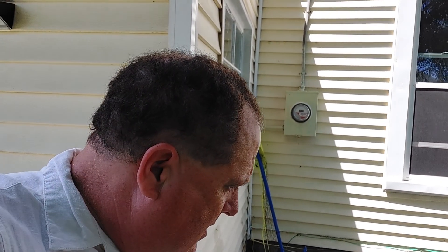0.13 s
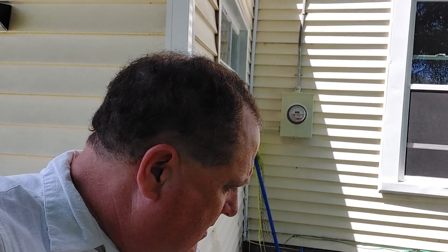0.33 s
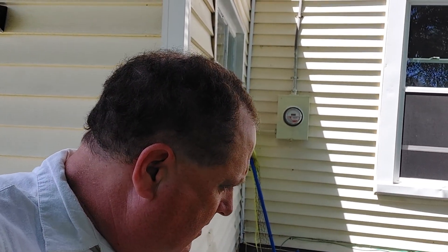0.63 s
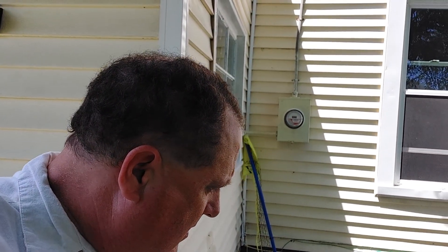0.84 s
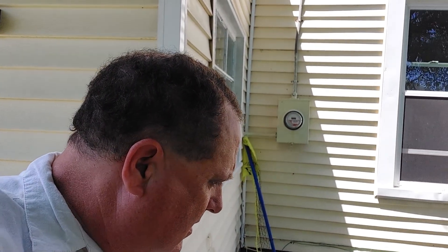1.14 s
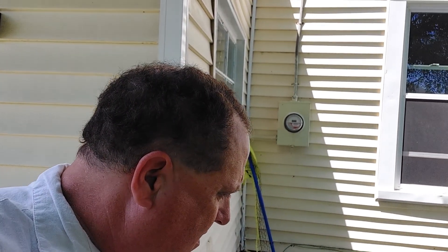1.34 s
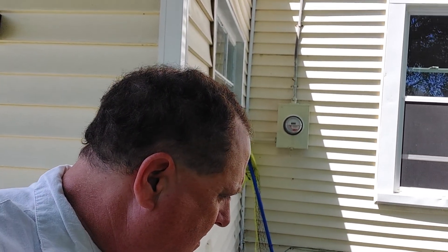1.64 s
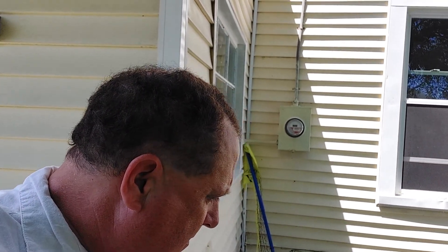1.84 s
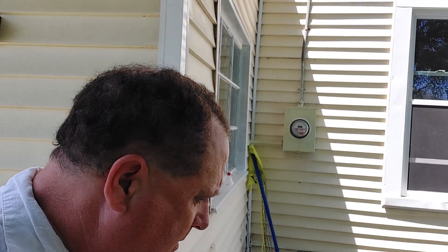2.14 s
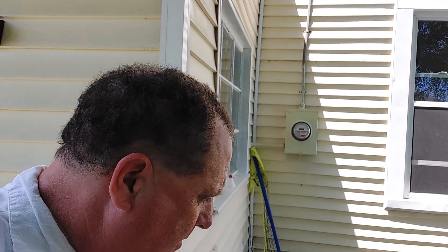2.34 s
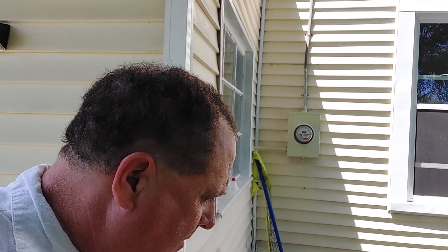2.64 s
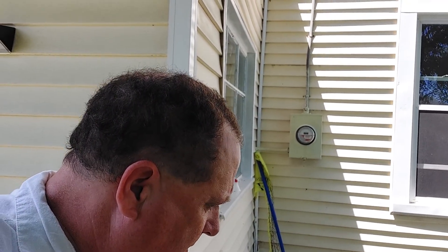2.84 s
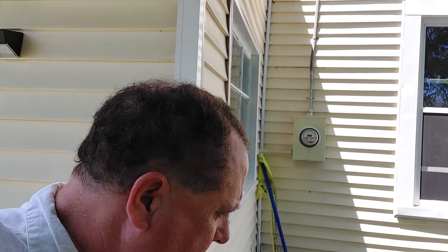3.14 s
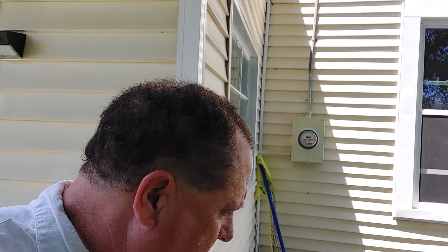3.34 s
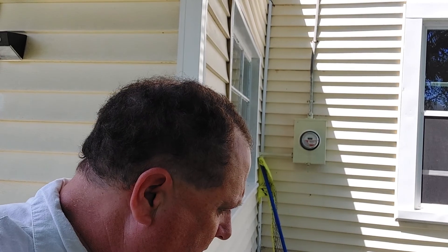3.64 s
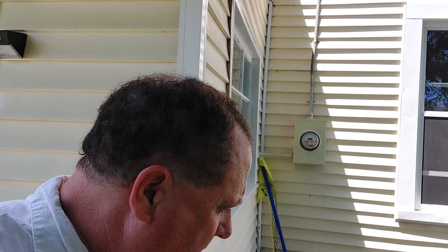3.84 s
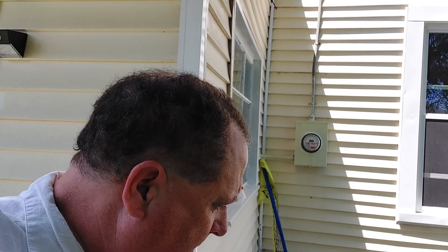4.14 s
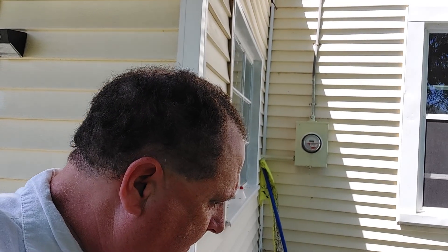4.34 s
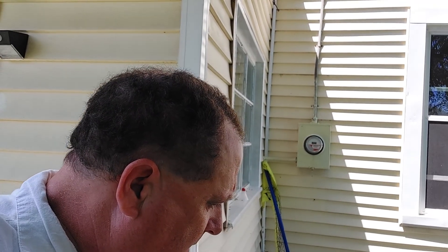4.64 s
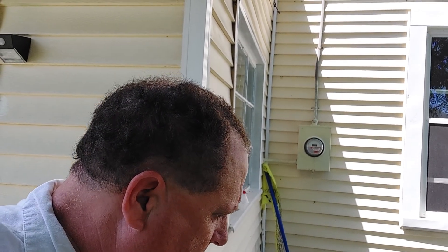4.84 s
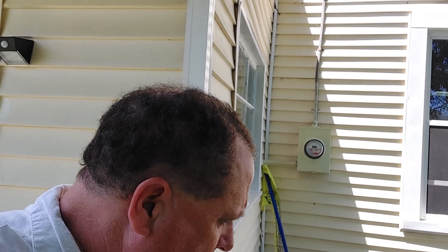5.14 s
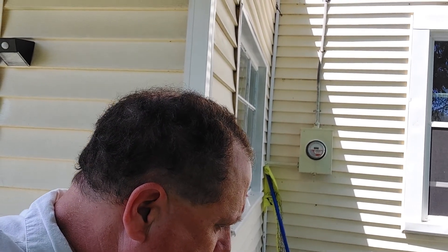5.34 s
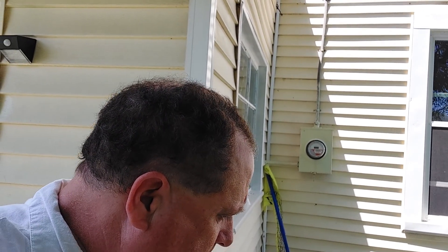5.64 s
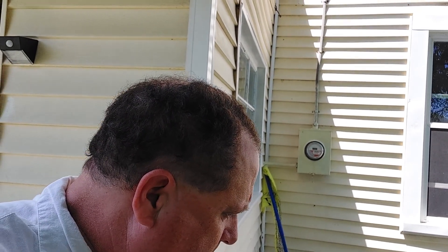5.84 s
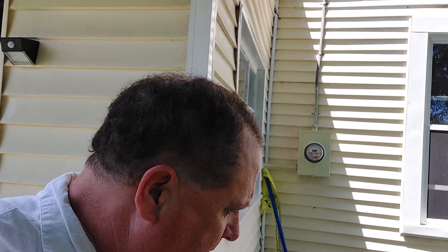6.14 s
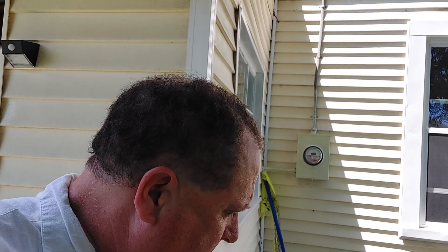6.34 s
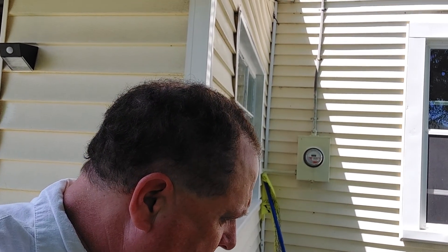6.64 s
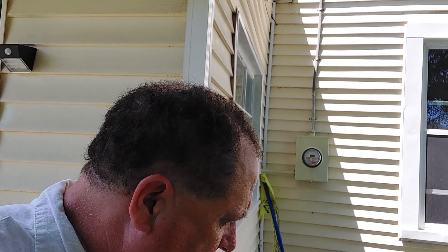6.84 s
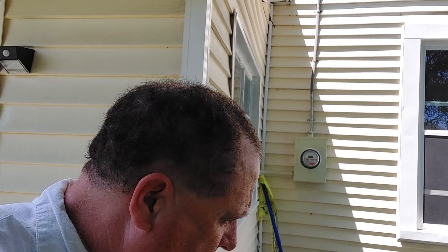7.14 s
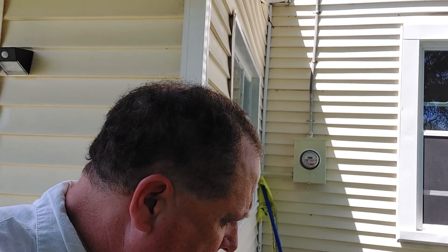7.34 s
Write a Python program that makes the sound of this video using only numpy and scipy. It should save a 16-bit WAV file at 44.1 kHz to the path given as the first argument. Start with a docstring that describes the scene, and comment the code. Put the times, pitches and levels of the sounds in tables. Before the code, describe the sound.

Outdoors, a utensil scrapes and squeaks on metal over low breeze rumble, then meat lands on a grill and sizzles sharply, spitting fat and slowly easing.

```python
"""A breeze rumbles on two microphone ports and a far motor drones, while a utensil scrapes and squeaks.
Then meat meets a small foil-lined backyard grill, close by: the sizzle flares up and slowly settles.
Steam noise and random rains of tiny bursts ring through the grill's bowl, with louder spits of fat.
Shaped noise makes the rustles, soft knocks and breeze; gliding or damped tones make squeaks, drone and thuds."""
import sys
import numpy as np
from scipy import signal
from scipy.fft import rfft, irfft
from scipy.io import wavfile
from scipy.ndimage import uniform_filter1d, map_coordinates

SR = 44100
rng = np.random.default_rng(int(sys.argv[2]) if len(sys.argv) > 2 else 0)


def transcribe(signal):
    """Save signal, clipped to [-1, 1], as a 16-bit WAV file at the path in sys.argv[1]."""
    frames = np.atleast_2d(signal).T
    limited = np.clip(frames, -1, 1)
    pcm = np.round(limited * 32767).astype(np.int16)
    wavfile.write(sys.argv[1], SR, pcm)


N = 329868
TIME = np.arange(N) / SR
HZ = np.fft.rfftfreq(N, 1 / SR)
# Table levels are in dB; some functions add a trim.


def gain_of(db):
    """Decibels to gain."""
    return 10 ** (np.asarray(db) / 20)


def evened(x):
    """Scales to an rms of 1."""
    return x / np.sqrt(np.mean(x ** 2) + 1e-20)


def read(points, hz, axis=1):
    """One column of a spectrum table, on a log-frequency axis."""
    points = np.asarray(points)
    return np.interp(np.log(hz + 1), np.log(points[:, 0] + 1), points[:, axis])


def follow(rows):
    """A curve of (time, value) points at every sample."""
    return np.interp(TIME, *np.transpose(rows))


def add(mix, start_s, sound):
    """Mixes a sound in at a time."""
    part = mix[:, round(start_s * SR):][:, :sound.shape[1]]
    part += sound[:, :part.shape[1]]


def flutter(rate_hz):
    """Random wandering of unit size, up to about the given rate."""
    spectrum = rfft(rng.standard_normal(N)) / (1 + (HZ / rate_hz) ** 2)
    return evened(irfft(spectrum, N))


def split(x, hz):
    """The parts of a sound below and above a frequency."""
    return [signal.sosfilt(signal.butter(2, hz, kind, fs=SR, output="sos"), x) for kind in ("low", "high")]


def swell(start_s, swell_s, steepness):
    """A push that rises to 1 in its swell time and lets go more slowly."""
    out, first = np.zeros(N), int(max(start_s, 0) * SR)
    u = TIME[:min(N - first, int(10 * swell_s * SR))] / swell_s
    out[first:first + len(u)] = (u * np.exp(1 - u)) ** steepness
    return out


def swells(rows, steepness):
    """The joint strength of a table of pushes."""
    return sum(gain_of(db) * swell(start_s, swell_s, steepness) for start_s, db, swell_s in rows)


# Likeness of the two ports for sounds of the grill and yard: pitch_hz, likeness (0-1)
SIZZLE_SAME = [(100, 0.98), (600, 0.91), (1150, 0.71), (1800, 0.99), (2500, 0.26), (4000, 0.37), (7000, 0),
               (11000, 0.08), (16000, .03)]
LAG_S = 7 / SR  # extra travel time to the left port


def ports(x, same):
    """Makes two unrelated signals partly alike; the grill is nearer the right port."""
    size = x.shape[1]
    hz = np.fft.rfftfreq(size, 1 / SR)
    right, other = rfft(x)
    likeness = np.clip(read(same, hz), 0, 1)
    left = likeness * right + np.sqrt(1 - likeness ** 2) * other
    left = left * np.exp(-2j * np.pi * hz * LAG_S)
    return irfft(np.array([left, right]), size)


# Resonances and one hollow of the grill's bowl: pitch_hz, width_hz, lift_db
BOWL = [(396, 124, 7.5), (565, 145, 11), (889, 140, 9), (1672, 340, 10), (2004, 504, 7.5), (2760, 190, -4),
        (3514, 270, 3.5), (4700, 340, 2.5), (6760, 130, 4.5)]


def bowl_db(hz):
    """The lift that the bowl's resonances give."""
    return sum(lift_db / (1 + (2 * (hz - f) / width) ** 2) ** 1.39 for f, width, lift_db in BOWL)


# Colour of the sizzle at the two ports: pitch_hz, left_db, right_db
SIZZLE_COLOUR = [(151, -17, -4.5), (313, -13.5, -9.5), (730, -15, -18.5), (1220, -9, -10.5),
                 (2280, -4.5, -9.5), (5320, -2, -3), (5900, -2.5, -5), (7140, -9.5, 0), (8400, -5.5, -8.5),
                 (10030, 1.5, -1.5), (12200, 0.2, 1), (15000, -11, 1.5), (16800, -1.5, -2)]


def grill_response(size=2048):
    """How one click on the grate rings at each port, with the energy as early as it can be (minimum phase)."""
    hz = abs(np.fft.fftfreq(size, 1 / SR))
    colour_db = np.array([read(SIZZLE_COLOUR, hz, axis=1), read(SIZZLE_COLOUR, hz, axis=2)])
    log_gain = np.log(gain_of(colour_db + bowl_db(hz)))
    return np.fft.ifft(np.exp(np.conj(signal.hilbert(log_gain)))).real[:, :size // 2]


def through_bowl(x, ring):
    """Lets a sound ring in the bowl."""
    return signal.oaconvolve(x, ring, axes=1)[:, :N]


# Hush of the still yard: pitch_hz, left_db, right_db
YARD_COLOUR = [(150, 11, 10), (250, 6.5, 7), (440, -5, -4), (780, -0.5, -3), (1450, -15, -19),
               (1700, -5, -12), (2300, -8, -22), (2820, -10, -12), (4000, -14, -28), (7200, -25, -27),
               (8360, -16, -26), (9700, -4.5, -11), (12500, -12, -10), (15500, -23, -12)]


def yard(level_db=-51.5, flicker_db=1.9):
    """The faint, even hush of the outdoors: coloured noise with a slight flicker."""
    colour = gain_of([read(YARD_COLOUR, HZ, axis=1), read(YARD_COLOUR, HZ, axis=2)])
    noise = ports(rng.standard_normal((2, N)) * gain_of(flicker_db * flutter(30)), SIZZLE_SAME)
    return evened(irfft(rfft(noise) * colour, N)) * gain_of(level_db)


# Lines of the far motor: pitch_hz, level_db
DRONE_LINES = [(67, -48.5), (86, -45.5), (118, -60), (141, -52.5)]
# Swell of the whole drone: time_s, level_db
DRONE_SWELL = [(0, -6.5), (.5, 3), (2.3, -0.5), (3.6, 3.5), (4.6, 0), (7.4, -34)]


def drone(trim_db=-1, waver_hz=1.27, left_db=-3, right_db=2.0):
    """A far motor: low sine lines that waver in pitch and strength."""
    lines = np.zeros(N)
    for hz, db in DRONE_LINES:
        strength = gain_of(db + 4.4 * flutter(2.1))
        turns = np.cumsum(hz + waver_hz * flutter(4.3)) / SR
        lines += strength * np.sin(2 * np.pi * turns)
    return lines * gain_of(follow(DRONE_SWELL) + trim_db) * gain_of([[left_db], [right_db]])


# Colour of the breeze: pitch_hz, level_db
BREEZE_COLOUR = [(15, -44), (30, -24), (48, -6), (65, 1.5), (86, -3), (102, -9), (125, -2.5), (145, -9.5),
                 (175, -27), (260, -21), (600, -67)]
# Likeness of the breeze at the two ports: pitch_hz, likeness (0-1)
BREEZE_SAME = [(30, 0.27), (70, 0.36), (200, 0.81)]


def eddies(depth):
    """Rumble of even strength on the two ports; bigger eddies sound deeper."""
    noise = ports(rng.standard_normal((2, N)), BREEZE_SAME)
    rumble = irfft(rfft(noise) * gain_of(read(BREEZE_COLOUR, HZ * depth)), N)
    return rumble / np.sqrt(uniform_filter1d((rumble ** 2).mean(0), size=6000))


# Strength of the breeze: time_s, level_db
BREEZE = [(0, -47.5), (.22, -37), (.85, -38), (1.45, -37), (1.8, -38.5), (2.3, -35), (2.8, -41),
          (4.2, -38.5), (4.7, -44.5), (5.6, -40), (6.6, -43), (7.48, -47.5)]
# Gusts that buffet the microphone: start_s, level_db, swell_s
GUSTS = [(.79, -25.5, 0.022), (1.27, -33, 0.029), (2.19, -33, 0.044), (3.27, -33, 0.035),
         (3.53, -29, 0.023), (3.71, -28.5, .035), (3.84, -29.5, 0.029), (3.94, -32, 0.017),
         (6.14, -34.5, 0.026)]


def breeze(left_db=-4, right_db=1.5, lumpy_db=1.5, gust_depth=1.18):
    """A lumpy breeze and a few deeper gusts rumble on the ports, more strongly on the right."""
    steady = eddies(1) * gain_of(follow(BREEZE) + lumpy_db * flutter(5.7))
    gusts = eddies(gust_depth) * swells(GUSTS, steepness=3.2)
    return (steady + gusts) * gain_of([[left_db], [right_db]])


# Colour of the rubbing food: pitch_hz, level_db
RUSTLE_COLOUR = [(100, -36), (185, -6.5), (230, 3.5), (290, -3), (400, -6.5), (600, -10.5), (1000, -17),
                 (1600, -19), (4000, -37)]
# Steady rubbing while the food is worked: time_s, level_db
RUBBING = [(0, -58), (1.4, -50), (2.5, -44), (3.3, -44), (4.2, -45.5), (5, -50), (5.9, -48.5), (6.6, -60),
           (7.48, -58.5)]
# Nudges that slide the food: start_s, level_db, swell_s
NUDGES = [(1.39, -49, 0.015), (2.39, -33.5, 0.034), (2.68, -37, 0.032), (3.03, -34.5, 0.05),
          (3.21, -37.5, 0.024), (4.635, -41, 0.041), (5.2, -42.5, .028), (7.015, -41, 0.02),
          (7.11, -46, 0.053)]


def rustle(trim_db=-2.5, rough_db=3.0, uneven_db=2.0):
    """Dull, uneven rubbing as the food is moved over the grate, louder at each nudge."""
    drive = ports(rng.standard_normal((2, N)) * gain_of(rough_db * flutter(50)), SIZZLE_SAME)
    colour = gain_of(read(RUSTLE_COLOUR, HZ) + 0.68 * bowl_db(HZ))
    sound = irfft(rfft(drive) * colour, N)
    rubbing = gain_of(follow(RUBBING) + uneven_db * flutter(2.5))
    strength = np.hypot(rubbing, swells(NUDGES, steepness=3.1))
    return evened(sound) * strength * gain_of(trim_db) * gain_of([[-1], [1]])  # stronger on the right


# Soft shoves on the grate: start_s, level_db, pitch_hz, swell_s
KNOCKS = [(.63, -51, 300, .006), (1.072, -47, 1100, 0.0045), (1.40, -42, 294, 0.013),
          (2.38, -42, 935, 0.031), (2.678, -38.5, 850, 0.011), (3.045, -41.5, 323, 0.025),
          (3.074, -38.5, 860, 0.018), (3.225, -42, 704, 0.0048), (7.022, -46, 400, 0.011)]


def knocks(trim_db=-2, grit_db=5.0, size=9000):
    """Each shove is a swell of small, damped bumps: gritty noise through one broad resonance."""
    out, t = np.zeros((2, N)), np.arange(size) / SR
    for start_s, db, hz, swell_s in KNOCKS:
        bumps = gain_of(grit_db * evened(uniform_filter1d(rng.standard_normal(size), size=150)))
        noise = ports(rng.standard_normal((2, size)) * bumps, SIZZLE_SAME)
        resonant = signal.lfilter(*signal.iirpeak(hz, 1.4, SR), noise)
        knock = split(resonant, 2 * hz)[0]
        push = t / swell_s * np.exp(1 - t / swell_s)
        add(out, start_s, evened(knock) * gain_of(db + trim_db) * push)
    return out


# Tight thuds at the grill, before and after the meat is laid on: start_s, level_db, pitch_hz
THUDS = [(.828, -35, 470), (1.329, -31, 380), (1.407, -34, 328), (1.748, -32, 520), (2.335, -30, 520),
         (3.002, -29.5, 480), (3.158, -30, 448), (3.5647, -28.5, 520), (3.5778, -28, 440),
         (3.7885, -27, 490), (3.7904, -28, 560), (3.8748, -34, 520), (3.894, -27.5, 480),
         (3.9064, -31, 600), (4.067, -31, 520), (4.142, -33, 520), (4.238, -32, 480), (4.666, -33, 400),
         (6.018, -31.5, 520)]
# What a thud leaves ringing in the bowl, relative to its push: pitch_hz, level_db, t60_s
THUD_RING = [(556, -20.5, 0.2), (885, -11.5, 0.031)]


def thuds(cycles=0.5, size=5000):
    """One damped push of the grate, then a faint ring of the bowl."""
    out, t = np.zeros((2, N)), np.arange(size) / SR
    ring = sum(gain_of(db - 60 * t / t60_s) * np.sin(2 * np.pi * f * t) for f, db, t60_s in THUD_RING)
    for start_s, db, hz in THUDS:
        push = np.sin(2 * np.pi * hz * t) * np.exp(-(t * hz / cycles) ** 2 / 2)
        thud = gain_of(db) * (push + ring)
        late = np.interp(t - LAG_S, t, thud)
        add(out, start_s, np.array([late, thud]))
    return out


# Strokes of the utensil over the metal: start_s, level_db, swell_s, pitch_hz (at full speed), width_hz
STROKES = [(.06, -65, 0.047, 2950, 600), (.52, -51, 0.32, 2500, 2100), (1.064, -41, 0.036, 1390, 2110),
           (1.188, -44, 0.016, 1950, 700)]
STROKE_SAG = 0.29  # share by which the rasp drops as the utensil comes to rest


def scrape(trim_db=-1, rough_db=1.0, skirt_db=-7):
    """Friction noise in one broad-skirted resonance; loudness and pitch follow the speed of each stroke."""
    drive = ports(rng.standard_normal((2, N)) * gain_of(rough_db * flutter(98)), SIZZLE_SAME)
    out = np.zeros((2, N))
    for start_s, db, swell_s, hz, width_hz in STROKES:
        speed = swell(start_s, swell_s, steepness=0.89)
        pitch_hz = hz * (1 - STROKE_SAG * (1 - speed))
        # shift the moving pitch down to zero, smooth there, then shift it back up
        turn = np.exp(2j * np.pi * np.cumsum(pitch_hz) / SR)
        r = np.exp(-np.pi * width_hz / SR)
        broad = signal.lfilter([1 - r], [1, -r], drive / turn)
        narrow = signal.lfilter([1 - r], [1, -r], broad)
        rasp = (turn * (narrow + gain_of(skirt_db) * broad)).real
        out += evened(rasp) * speed * gain_of(db + trim_db)
    return split(out, 9800)[0]


# Thin squeaks as the utensil drags: start_s, length_s, level_db, first_pitch_hz, last_pitch_hz
SQUEAKS = [(.075, .055, -62, 3060, 2980), (.11, .075, -62, 2650, 2980), (.52, 0.17, -60, 2230, 2080),
           (.735, 0.065, -57, 2580, 2680), (1.329, 0.07, -55.5, 2560, 2930)]


def squeaks(jitter_hz=70):
    """Stick and slip: a faint, unsteady whistle that glides."""
    out, wobble_hz = np.zeros((2, N)), jitter_hz * flutter(114)
    for start_s, length_s, db, first_hz, last_hz in SQUEAKS:
        u = np.clip((TIME - start_s) / length_s, 0, 1)
        turns = np.cumsum(first_hz + (last_hz - first_hz) * u + wobble_hz) / SR
        out += gain_of(db) * np.sin(np.pi * u) * np.sin(2 * np.pi * turns)
    return out


def burst(snap, spray_s, echo_db, echo_s, size=2600):
    """One bubble bursts: a snap, a short spray, and scatter off the foil and the house walls."""
    t = np.arange(size) / SR
    fade = np.exp(-t / spray_s) + gain_of(echo_db) * np.exp(-t / echo_s)
    x = rng.standard_normal((2, size)) * fade
    x /= np.linalg.norm(x, axis=1, keepdims=True)
    x[0, 0] += snap
    x[1, rng.integers(2, 20)] += snap * rng.choice([-1, 1])
    return x


def crackle(per_s, spread_db, count=24):
    """A random rain of bursts of many sizes, in count kinds; each kind rings at its own pitch."""
    out = np.zeros((2, N))
    for hz in np.geomspace(1800, 14000, count):
        gap, sign, size = rng.random((2000, 3)).T
        at = (np.cumsum(-np.log(1 - gap)) * count / per_s * SR).astype(int)
        height_db = spread_db * np.minimum(-np.log(1 - size), 3.5)
        height = np.sign(sign - .5) * gain_of(height_db)
        grain = burst(snap=.7, spray_s=.0008, echo_db=-11, echo_s=.007)
        pitched = signal.lfilter(*signal.iirpeak(min(hz, SR / 2.5), 2, SR), grain)
        grain = evened(grain + 1.1 * pitched)
        for start, h in zip(at[at < N], height):
            add(out, start / SR, h * grain)
    return evened(out)


def simmer(ring, level_db=-60):
    """Even before the flare, a few drops of fat tick faintly on the hot foil."""
    ticks = through_bowl(crackle(per_s=70, spread_db=3), ring)
    return evened(split(ticks, 9100)[1]) * gain_of(level_db)


# Single spits of fat: start_s, level_db (over the first 3 ms), low_body_db (relative to the high part), spray_s
SPITS = [(0.3885, -30.5, -13, .0006), (0.4728, -46, -19, .0012), (0.8719, -49, -9, .002),
         (1.083, -46, -8, .002), (1.104, -44, -12, .002), (1.2555, -46, -6, .003), (1.2926, -39, -9, .004),
         (1.5701, -34, -14, .004), (1.594, -37, -15, .002), (1.656, -31.5, -17, .004),
         (1.712, -37, -3, .002), (1.775, -35, -10, .002), (1.8688, -25.5, -6, .003),
         (1.9125, -29, -15, .004), (1.9738, -30, -2, .002), (2.0101, -26, -11, .0006),
         (2.1674, -24.5, -22, .001), (2.5455, -32, 2, .0015), (2.8861, -29.5, -16, .001),
         (2.9812, -23.5, -14, .0006), (3.0297, -26, 0, .0016), (3.2374, -32, 1, .001),
         (3.3105, -29, -10, .001), (3.5163, -29, -14, .0003), (3.8445, -33, 3, .0015),
         (3.9139, -25, -21, .0002), (4.069, -31, -16, .0005), (4.31, -31, -16, .0007),
         (4.498, -32, -12, .0015), (4.9663, -30, -22, .001), (4.9806, -26, -13, .0009),
         (4.9934, -29, -3, .0015), (5.0402, -28, -7, .002), (5.1298, -26.5, -1, .005),
         (5.2275, -32, -6, .003), (5.3685, -32, -12, .002), (5.3797, -31, -2, .0015),
         (5.4133, -28.5, -6, .0013), (5.4568, -35, 1, .002), (5.542, -35, 2, .003),
         (6.0428, -32, -4, .0015), (6.1128, -28, -4, .003), (6.1303, -33, -5, .004),
         (6.1655, -35, -5, .003), (6.2465, -39, 2, .001), (6.3959, -36, -12, .0015),
         (6.7429, -31.5, -18, .0005), (6.8255, -39, 1, .003), (6.8428, -27.5, -19, .003),
         (7.192, -33, -7, .003)]


def spits(ring, trim_db=-0.5, size=140):
    """Large bubbles of fat burst, each with its own length of spray."""
    out = np.zeros((2, N))
    for start_s, db, low_db, spray_s in SPITS:
        scatter_db = np.interp(low_db, [-20, -5], [-20, -16])
        pop = ports(burst(snap=.45, spray_s=spray_s, echo_db=scatter_db, echo_s=.006), SIZZLE_SAME)
        low, high = split(signal.fftconvolve(pop, ring, axes=1), 3200)
        # the less body, the higher the tick
        high = split(high, np.interp(low_db, [-20, -6], [8200, 3000]))[1]
        low, high = low / np.std(low[:, :size]), high / np.std(high[:, :size])
        add(out, start_s, gain_of(db + trim_db) * (high - gain_of(low_db) * low))
    return out


# Short changes in the strength of the sizzle, mostly surges: start_s, lift_db, swell_s
STRENGTH_CHANGES = [(1.64, 2.5, 0.015), (1.70, 3.5, 0.017), (1.77, 3, 0.015), (1.96, 2, 0.045),
                    (2.19, 0, 0.052), (2.48, 0.5, 0.048), (4.3, 2, 0.032), (5.15, 2.2, 0.027),
                    (5.37, 1.5, 0.056), (6.109, 1.5, 0.027), (6.2, 1, 0.023), (6.81, -0.5, 0.017),
                    (7.16, 3, 0.02), (7.36, 3, .015)]
TOUCH_S = 1.487  # the meat meets the hot metal
SETTLE_S, SETTLE_DB = 1.867, 3.3  # it settles flat on the grate and the sizzle steps up


def frying_db(idle_db, caught_db, full_db, catch_s, spread_s, drying_db_per_s):
    """How hard the meat fries: idle, catch, spread, a step as it settles, slow drying and short changes."""
    stages_s = TOUCH_S + np.cumsum([0, catch_s, spread_s])
    stage_db = np.interp(TIME, stages_s, [idle_db, caught_db, full_db])
    dried_db = drying_db_per_s * np.maximum(TIME - stages_s[-1], 0)
    # the sizzle is held back more and more, then let go at once as the meat settles
    unsettled_db = np.interp(TIME, [stages_s[1], SETTLE_S], [0, SETTLE_DB], right=0)
    change_db = sum(db * swell(start_s, swell_s, steepness=1.1) for start_s, db, swell_s in STRENGTH_CHANGES)
    return stage_db - unsettled_db - dried_db + change_db


# Low bubbling, in the pops and the sizzle: idle_db, caught_db, full_db, catch_s, spread_s, drying_db_per_s
BUBBLING = (-65.5, -49.5, -43, 0.08, 0.7, 1.85)


def pops(ring, trim_db=-3.5):
    """Larger bubbles pop irregularly, low and hollow, as hard as the meat fries."""
    rain = ports(crackle(per_s=90, spread_db=4.0), SIZZLE_SAME)
    hollow = split(through_bowl(rain, ring), 2420)[0]
    return evened(hollow) * gain_of(trim_db + frying_db(*BUBBLING))


# Near surfaces that throw the sizzle back: extra_path_s (varied by a fifth at each port), strength_db
MIRRORS = [(.0006, -19), (.0013, -12.5), (.0024, 2.5), (.0052, 1)]


def reflections(x, sway_s=.0001):
    """Near echoes comb the hiss; the comb drifts as the hand-held camera sways."""
    out = x.copy()
    for path_s, db in MIRRORS:
        for port in range(2):
            delay_s = path_s * rng.uniform(.8, 1.2) + sway_s * flutter(0.91)
            out[port] += gain_of(db) * map_coordinates(x[port], [(TIME - delay_s) * SR], order=2)
    return out


def patchy(x, patchy_db=1.64, size=512):
    """Random patches in pitch and time make the colour of the hiss uneven."""
    z = signal.stft(x, nperseg=size, noverlap=size * 3 // 4)[2]
    patches = rng.standard_normal(z.shape[1:])  # pitch by time
    patches = uniform_filter1d(patches, size=5, axis=0)
    patches = evened(uniform_filter1d(patches, size=9, axis=1))
    return signal.istft(z * gain_of(patchy_db * patches), nperseg=size, noverlap=size * 3 // 4)[1][:, :N]


# Middle spatter of the sizzle: idle_db, caught_db, full_db, catch_s, spread_s, drying_db_per_s
SPATTER = (-61.5, -40.3, -33.2, 0.045, 0.6, 2.05)
# Fine fizz on top: idle_db, caught_db, full_db, catch_s, spread_s, drying_db_per_s
FIZZ = (-59.5, -44, -32, 0.18, 0.45, 2.5)
# Little jets of steam that hiss above the fizz: start_s, level_db, swell_s
JETS = [(1.545, -38, .018), (1.6, -44, .02), (1.645, -35.5, .012), (1.692, -42, .015), (1.805, -38.5, .008),
        (4.94, -41, .025), (6.67, -44.5, .022), (6.735, -44.5, .012)]


def sizzle(ring, crackle_db=-1, tick_db=-5, flicker_db=0.5, spatter_db=-4.0, fizz_db=2.0, bubbling_db=3.5):
    """Steam hiss and crackle ring in the bowl; bubbling, spatter and fine fizz each waver on their own."""
    steam = rng.standard_normal((2, N)) * gain_of(flicker_db * flutter(40))
    drive = patchy(evened(steam) + gain_of(crackle_db) * crackle(per_s=1100, spread_db=4.0))
    coarse, fine = split(through_bowl(ports(drive, SIZZLE_SAME), ring), 2800)
    middle, top = split(fine, 8200)

    bubbling_level_db = bubbling_db + frying_db(*BUBBLING) + 1.5 * flutter(69)
    bubbling = evened(coarse) * gain_of(bubbling_level_db)

    spatter_level_db = spatter_db + frying_db(*SPATTER) + 0.81 * flutter(16)
    spatter = evened(reflections(middle)) * gain_of(spatter_level_db)

    # the smallest bubbles tick only up high
    tiny = split(through_bowl(crackle(per_s=270, spread_db=3.9), ring), 14000)[1]
    fizz_level_db = fizz_db + frying_db(*FIZZ) + 1.0 * flutter(20)
    fizz = evened(evened(top) + gain_of(tick_db) * evened(tiny)) * gain_of(fizz_level_db)

    hiss = split(through_bowl(rng.standard_normal((2, N)), ring), 11000)[1]
    jets = evened(hiss) * swells(JETS, steepness=1.8)
    return bubbling - spatter + fizz + jets  # neighbouring bands are opposed where they meet


def scene():
    """All that sounds around the grill."""
    ring = grill_response()
    background = yard() + drone() + breeze()
    handling = rustle() + knocks() + thuds() + scrape() + squeaks()
    frying = simmer(ring) + spits(ring) + pops(ring) + sizzle(ring)
    return background + handling + frying


EDGE_HZ = 15820  # top of the camera's band


def record(dry):
    """The camera's band limit: a steep low-pass filter."""
    low_pass = signal.firwin(701, EDGE_HZ, window=("kaiser", 8), fs=SR)
    return signal.oaconvolve(dry, low_pass[None], "same", axes=1)


dry = scene()
out = record(dry)
transcribe(out)
```